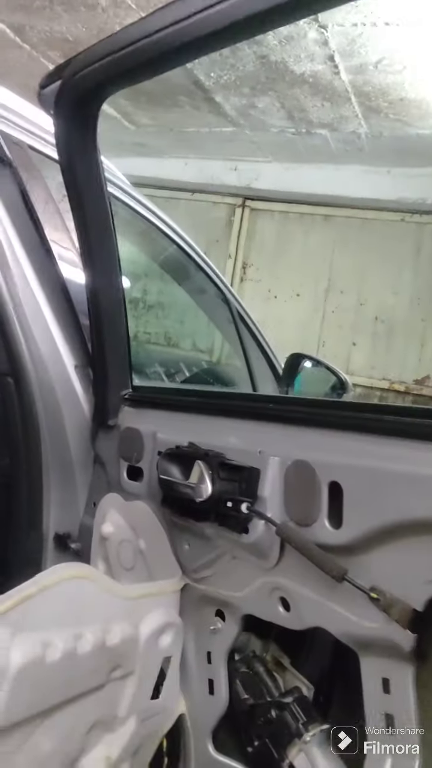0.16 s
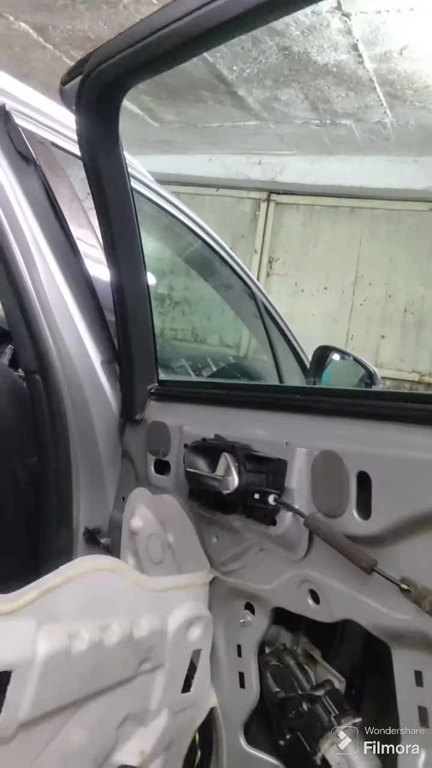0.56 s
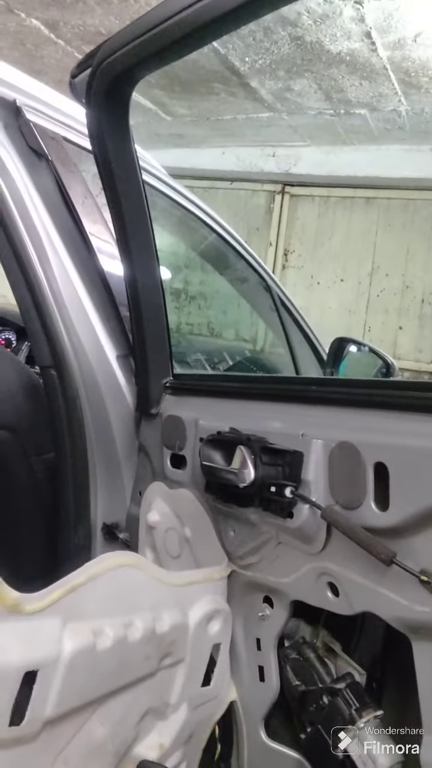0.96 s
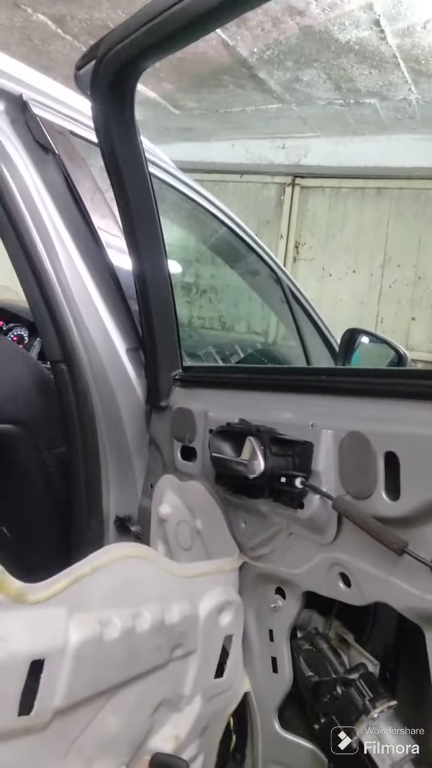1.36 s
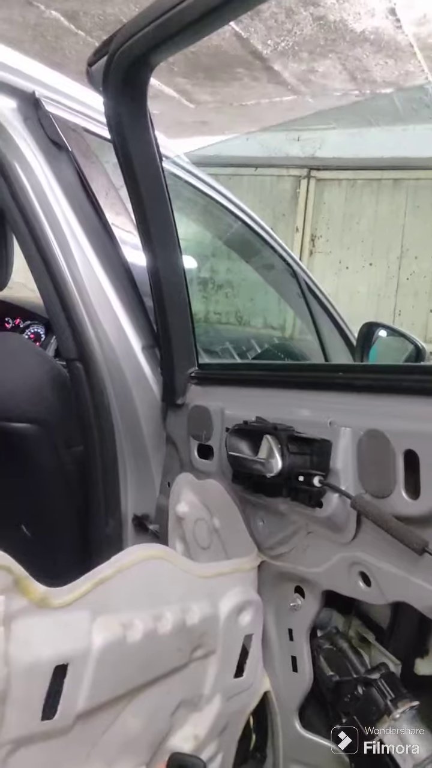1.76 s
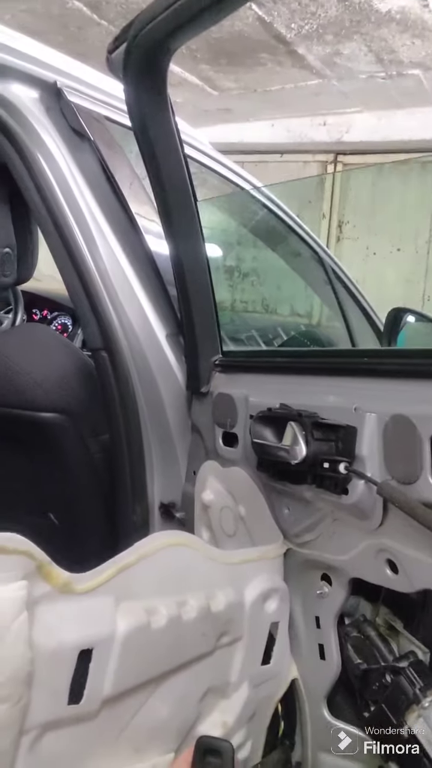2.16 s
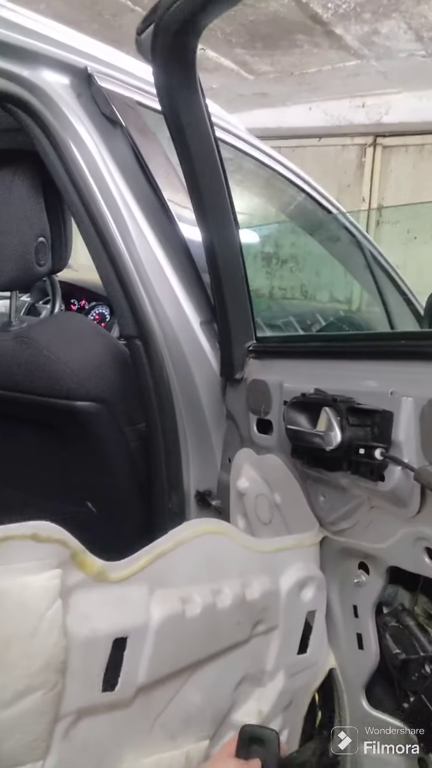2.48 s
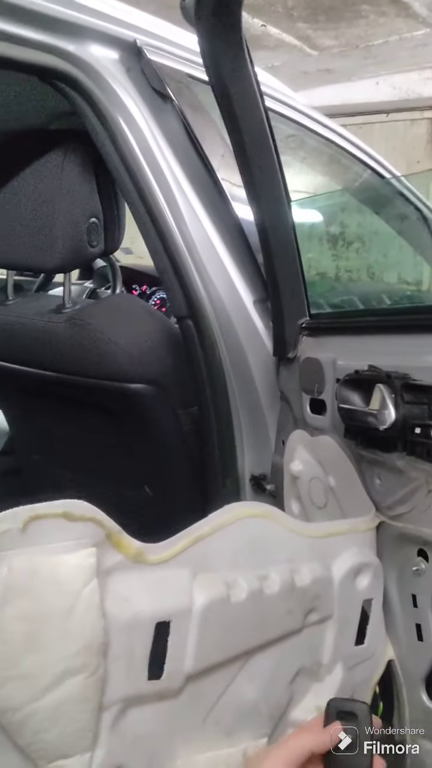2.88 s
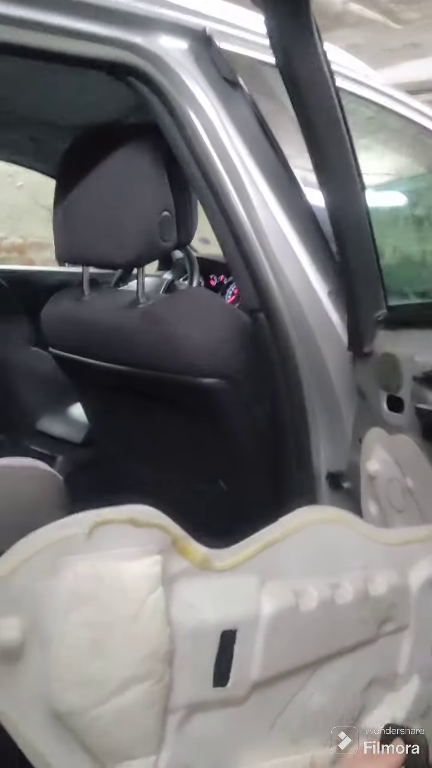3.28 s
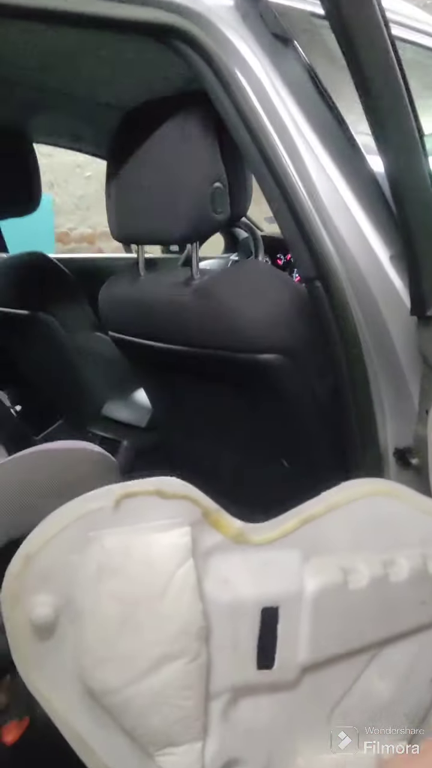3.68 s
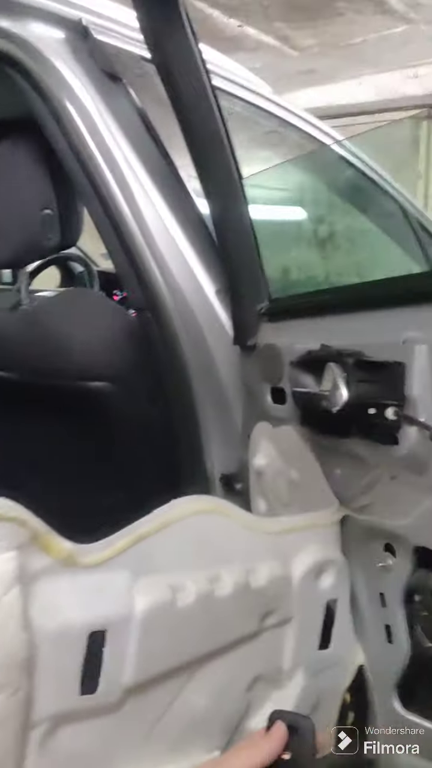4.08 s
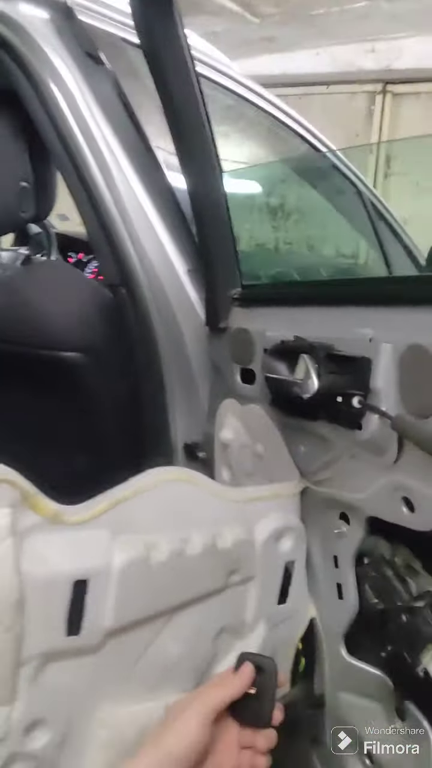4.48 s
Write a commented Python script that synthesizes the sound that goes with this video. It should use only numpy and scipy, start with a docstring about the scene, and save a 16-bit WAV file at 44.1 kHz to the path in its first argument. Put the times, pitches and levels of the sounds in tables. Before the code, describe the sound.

Close to a car door with its trim removed in a quiet garage, two clicks with small knocks come first over low hum. A third click brings a heavy hollow knock and scrape as the window motor starts. It whirs and buzzes steadily, growing rougher under load, then cuts off with a click and clunk. The glass briefly rubs as it settles, followed by near silence and faint ticks.

```python
"""A quiet garage hums, then a relay clicks: a window motor in a stripped car door is about to run.
The drive takes up its slack with a knock, the glass pulls out of its seal and runs down, the motor brakes
and the glass settles. The motor is sine tones and noise locked to one turning shaft; relays, seal and small
ticks are shaped noise; blows ring the modes of the door shell; hum, murmur, hush and thin tones lie behind."""
import sys
import numpy as np
from scipy import signal
from scipy.fft import rfft, irfft, next_fast_len
from scipy.io import wavfile
from scipy.ndimage import map_coordinates

SR = 44100
rng = np.random.default_rng(int(sys.argv[2]) if len(sys.argv) > 2 else 0)


def ratio(d):
    """dB to gain"""
    e = np.asarray(d, float) / 20
    return 10 ** e


def log_audio(samples):
    """Write samples as a 16-bit WAV file to the path given in sys.argv[1]."""
    # one column per channel
    frames = np.atleast_2d(samples).T
    # limit to full scale, then quantise
    limited = np.clip(frames, -1, 1)
    pcm = np.round(limited * 32767).astype(np.int16)
    wavfile.write(sys.argv[1], SR, pcm)


N = 204121


def unit(x):
    """Scale to rms 1."""
    return x / np.sqrt(np.mean(x ** 2) + 1e-20)


def along(points, hz):
    """Read a curve of (Hz, value) points on a log frequency axis."""
    f, v = np.transpose(points)
    return np.interp(np.log(hz + 1), np.log(f + 1), v)


def curves(rows):
    """One value per sample for each column after the time."""
    s, *cols = np.transpose(rows)
    return [np.interp(np.arange(N) / SR, s, c) for c in cols]


def gate(start, stop, rise, fall):
    """Fade in over rise seconds from start; after stop, drop 60 dB in each fall seconds."""
    t = np.arange(N) / SR
    return np.clip((t - start) / rise, 0, 1) * ratio(-60 * np.maximum(t - stop, 0) / fall)


def wobble(rate):
    """A smooth random curve, rate knots a second."""
    s = np.arange(0, N + 32, 32) / SR
    knots = rng.standard_normal(int(N * rate / SR) + 4)
    return np.interp(np.arange(N) / SR, s, map_coordinates(knots, [s * rate]))


def coloured(x, gain_db):
    """Filter x by a dB function of frequency."""
    m = next_fast_len(len(x) + 4096)
    gain = ratio(gain_db(np.fft.rfftfreq(m, 1 / SR)))
    return irfft(rfft(x, m) * gain, m)[:len(x)]


def noise(spectrum, length=N, tilt_db=0):
    """Noise of rms 1 with a spectrum, tilted by dB per octave about 2 kHz."""
    white = rng.standard_normal(length)
    return unit(coloured(white, lambda f: along(spectrum, f) + tilt_db * np.log2((f + 50) / 2000)))


def peaks(rings):
    """dB gain over frequency of (Hz, width Hz, dB) resonances."""
    return lambda f: sum(db / (1 + (2 * (f - c) / w) ** 2) for c, w, db in rings)


BARS = 10  # commutator bars on the shaft
# How fast commutator bars pass the brushes: start_s, bar_rate_hz [s, Hz]
SPEED = [(1.27, 881.0), (1.308, 893.8), (1.59, 865), (1.696, 866.6), (1.78, 859.0), (1.846, 835),
         (1.948, 856), (2.032, 841.5), (2.154, 848.5), (2.196, 837.1), (2.318, 830), (2.536, 846),
         (2.548, 851.6), (2.64, 850.5)]
# The glass meets a stiffer stretch of track: start_s, load, effort_db [s, 0-1, dB]
DRIVE = [(1.26, 0.08, 6), (1.33, 0.02, 2), (1.48, 0.18, 1), (1.62, 0.31, -2.5), (1.75, .52, -2.5),
         (1.83, 0.64, 0), (1.93, 0.73, 1), (2.2, 0.83, 0.5), (2.4, 0.88, 0.5), (2.64, .98, -0.5)]


def motor():
    """One slightly unsteady shaft angle, with load and effort, drives every tone and noise of the motor."""
    bar_hz, = curves(SPEED)
    load, effort_db = curves(DRIVE)
    load = np.clip(load, 0, 1)
    turn = 2 * np.pi * np.cumsum(bar_hz * (1 + .0015 * wobble(30))) / SR / BARS  # shaft angle, radians
    low = gear_growl(turn, load, effort_db) + shaft_tones(turn, load, effort_db)
    running = (low + brush_hiss(turn, load, effort_db)) * gate(1.105, 2.655, rise=0.11, fall=0.17)
    bars = bar_tones(turn, load, effort_db) * gate(1.215, 2.645, rise=0.066, fall=0.071)
    return running + bars + throb(turn, load) * gate(1.09, 2.71, rise=0.061, fall=0.49)


# Commutator tones at zero effort; the swing comes once a turn:
# bar_rate_multiple, light_load_db, heavy_load_db, swing_rad [-, dB, dB, radians]
BAR_TONES = [(2, -65.5, -63, 0.74), (3, -70.5, -68, 1.4), (4, -64.5, -61.5, 0.44), (5, -64, -63.5, 0.49),
             (6, -68, -66, .7), (7, -68, -67, .7), (9, -77, -77, 1.9), (10, -79, -68, 1.6),
             (12, -84, -75, 1.6), (13, -76.5, -69, 1.6)]


def bar_tones(turn, load, effort_db):
    """Multiples of the bar rate; the armature runs a little off centre, so each swings in phase once a turn."""
    grows, flicker_db = 1.34, 3  # dB per dB of effort; random level flicker
    out = 0
    for k, light_db, heavy_db, swing in BAR_TONES:
        level_db = (1 - load) * light_db + load * heavy_db + grows * effort_db
        level = ratio(level_db + flicker_db * wobble(9.005))
        out = out + level * np.sin(k * BARS * turn + swing * np.sin(turn + k))
    return out


# Shaft orders at light and at heavy load, relative levels: turn_multiple, level_db [-, dB]
SHAFT_LIGHT = [(1, -7), (2, -3.5), (3, 5.5), (4, -1), (5, -1.5), (6, -3.5), (7, -6.5), (8, -13.5), (9, 3),
               (10, -6), (11, -5), (12, -12), (13, -16), (14, -38), (15, -23), (16, -14), (17, -45),
               (18, -8), (19, -47), (20, -12), (21, -36), (22, -7.5)]
SHAFT_HEAVY = [(1, 0), (2, -29), (3, -6.5), (4, 1), (5, -4.5), (6, -2), (7, -13.5), (8, -2), (9, -7.5),
               (10, 3), (11, -1), (12, -9), (13, -17), (14, -39), (15, -31), (16, -14), (17, -45),
               (18, -14), (19, -48), (20, -17.5), (21, -37), (22, -6)]
LOW_GROWS = 0.33  # dB that shaft tones and growl gain for each dB of effort


def shaft_tones(turn, load, effort_db):
    """Multiples of the turning rate, each wavering in level and phase; the first order is left to throb()."""
    orders = 0
    for (k, light_db), (_, heavy_db) in zip(SHAFT_LIGHT[1:], SHAFT_HEAVY[1:]):
        level = ratio((1 - load) * light_db + load * heavy_db + 3 * wobble(5))
        orders = orders + level * np.sin(k * turn + .35 * wobble(5))
    return ratio(-54.8 + LOW_GROWS * effort_db) * unit(orders)


def throb(turn, load):
    """The shaft throbs in the door once per turn, rising 13 dB as the load goes from 0.55 to 0.67."""
    free = np.clip((0.67 - load) / .12, 0, 1)
    return ratio(-50 - 13 * free + 2.2 * wobble(18)) * np.sin(turn)


# Gear growl at light and at heavy load: pitch_hz, density_db [Hz, dB per Hz]
GROWL_LIGHT = [(65, -47.5), (110, -16), (261, -1.5), (301, -9), (434, -6), (563, -13.5), (771, -3),
               (1230, -23), (2500, -14.5), (3250, -38), (5500, -120)]
GROWL = [(65, -40.5), (110, -1), (136, -17.5), (232, -2), (338, -4.5), (563, -8), (856, -8.5),
         (1170, -11.5), (1730, -12), (2500, -23.5), (3250, -52), (5500, -120)]


def gear_growl(turn, load, effort_db):
    """Low noise crossfaded from light to heavy colour by the load, pulsing gently once a turn."""
    growl = np.sqrt(1 - load) * noise(GROWL_LIGHT) + np.sqrt(load) * noise(GROWL)
    pulse = (1 + 0.12 * np.sin(turn)) * ratio(2.1 * wobble(24.8))
    return ratio(-55 + LOW_GROWS * effort_db) * growl * pulse


# Brush hiss and the sizzle above it: pitch_hz, density_db [Hz, dB per Hz]
HISS = [(590, -37), (1000, -1.5), (1510, -9), (1730, -3), (2340, -8.5), (3120, -5.5), (3370, -7),
        (3600, -7.5), (4260, -8), (7500, -21.5), (9750, -39), (16500, -120)]
SIZZLE = [(3820, -25.5), (6500, -2), (7910, -8.5), (8490, -2), (9910, -3), (10800, -2), (14600, -6.5),
          (16000, -11)]


def brush_hiss(turn, load, effort_db):
    """Brush noise pulsing with each bar, plus a rub that repeats each turn, in two bands that grow with effort."""
    pulsed = rng.standard_normal(N) * (1 + .4 * np.sin(BARS * turn))
    rub = .75 * pulsed + .65 * repeating(turn, renew=14)
    hiss, sizzle = [unit(coloured(rub, lambda f: along(spectrum, f))) for spectrum in (HISS, SIZZLE)]
    hiss_level = ratio(-58 + 1.06 * effort_db)
    sizzle_level = ratio(-63 + 0.65 * effort_db + 3 * load)
    return (hiss_level * hiss + sizzle_level * sizzle) * ratio(1.2 * wobble(39.96))


def repeating(turn, renew):
    """A rubbing pattern that returns each turn, a comb of shaft orders, blending into new ones renew times a second."""
    size = 1024  # points round the shaft
    spectra = rfft(rng.standard_normal((int(N / SR * renew) + 2, size)))
    patterns = irfft(spectra[:, :190], size)  # smooth: orders below 190 only
    where = [np.arange(N) / SR * renew, turn / (2 * np.pi) % 1 * size]
    return unit(map_coordinates(patterns, where, order=1, mode="grid-wrap"))


# Relay contacts: start_s, snap_db, tail_db, tilt_db [s, dB, dB, dB per octave]
CLICKS = [(0.3782, -29.5, -47, 3.5), (0.772, -34.5, -50, -2), (1.1035, -28, -42.5, -2),
          (2.653, -32, -47, -2.2)]
# Colour of a relay click: pitch_hz, density_db [Hz, dB per Hz]
RELAY = [(530, -29), (900, -9.5), (1120, -3.5), (1340, -17.5), (1680, -0.5), (1960, -6.5), (2160, -6),
         (4120, -4.5), (5900, -7), (8150, -6.5), (8970, -12.5), (10700, -6), (16000, -16)]
# Relay case resonances: pitch_hz, width_hz, gain_db [Hz, Hz, dB]
RELAY_RINGS = [(1610, 130, 6), (1820, 120, 7), (3020, 440, 7.5), (3890, 280, 7), (4130, 200, 3.5),
               (4950, 184, 5), (6630, 450, 5), (6980, 270, 5), (10600, 520, 3.5), (12900, 520, 3),
               (14700, 330, 13)]


def clicks():
    """A snap of a few ms through the relay case; a duller tail follows and dies ever faster."""
    snap_t60_s, tail_t60_s, rise_s = .015, .113, .0003
    out, t = np.zeros(N + SR), np.arange(SR // 3) / SR
    for s, snap_db, tail_db, tilt_db in CLICKS:
        # the case rings a little differently at each click
        rings = peaks([(hz, width, db + 1.5 * rng.standard_normal()) for hz, width, db in RELAY_RINGS])
        sharp, dull = [unit(coloured(noise(RELAY, len(t), tilt_db - lean), rings)) for lean in (0, 1.5)]
        snap = ratio(snap_db - 60 * t / snap_t60_s) * sharp
        tail = ratio(tail_db - 30 * t / tail_t60_s - 30 * (t / tail_t60_s) ** 3) * dull
        out[round(s * SR):][:len(t)] += (snap + tail) * (1 - np.exp(-t / rise_s))
    return out[:N]


# Blows on the door shell; modes one breadth from the centre lose 6 dB:
# start_s, level_db, centre_hz, breadth_octaves [s, dB, Hz, octaves]
BLOWS = [(.381, -50, 1500, 2.7), (.396, -51, 358, 0.8), (.776, -43.5, 600, 2.2), (.79, -45, 304, 1.2),
         (1.106, -38, 300, 2.1), (1.118, -30, 240, 1.7), (1.141, -34.5, 600, 4), (1.158, -37, 760, 2),
         (1.171, -38, 230, 1.34), (1.24, -49.5, 260, 0.53), (2.664, -37, 1100, 1.1),
         (2.678, -36.5, 730, 0.62), (2.68, -47, 230, .5), (2.697, -42, 235, .6), (3.53, -68, 330, .7),
         (4.115, -67, 400, 2)]
# Door shell modes, relative level and decay before damping: pitch_hz, level_db, t60_s [Hz, dB, s]
DOOR = [(125, -6, .15), (179.6, -2, 0.26), (203.4, -7, 0.39), (237, 3.5, 0.22), (297.3, 4, 0.18),
        (372.3, -1.5, 0.38), (445.3, -4, 0.13), (536, -5.5, 0.14), (621, -1, 0.18), (666, -4, 0.091),
        (760, -1.5, 0.19), (1006, -5.5, 0.17), (1093, -6.5, 0.19), (1270, -3.5, 0.11), (1418, -6, 0.16),
        (1600, -22, 0.033), (1610, 7, 0.035), (1700, -24, 0.13), (2010, -3, 0.093), (2500, -5, 0.051),
        (3000, -18, 0.11)]


def door():
    """Each blow rings the shell modes near its own pitch, with loose parts crunching."""
    free_below_db, damping_per_db, rise_s = -45.5, 0.0755, 0.0033
    out, t = np.zeros(N + SR), np.arange(SR // 2) / SR
    hz, mode_db, t60 = np.transpose(DOOR)[:, :, None]
    for s, db, centre_hz, octaves in BLOWS:
        # harder blows keep the parts pressed on the shell, so it dies sooner
        damping = 1.13 + damping_per_db * max(db - free_below_db, 0)
        reach = lambda f: -6 * (np.log2((f + 20) / centre_hz) / octaves) ** 2
        # each mode strays in level (dB) and in pitch (share of its frequency)
        stray_db, detune = rng.standard_normal((2, len(DOOR), 1)) * [[[2]], [[.008]]]
        level = ratio(db + mode_db + reach(hz) + stray_db - 60 * damping * t / t60)
        phase = 100 * detune  # scattered too
        ring = (level * np.sin(2 * np.pi * (hz * (1 + detune) * t + phase))).sum(0)
        rattle = unit(coloured(noise(GROWL, len(t)), reach))
        crunch = ratio(db - 0.5 - 60 * damping * t / 0.23) * rattle
        out[round(s * SR):][:len(t)] += (ring + crunch) * (1 - np.exp(-t / rise_s))
    return out[:N]


# The whole door sways on its hinges: start_s, level_db, pitch_hz, length_s [s, dB peak, Hz, s]
SWAY = [(1.124, -29.5, 59, 0.093), (1.225, -41.5, 57.2, 0.094), (1.342, -46, 51.7, 0.052),
        (1.411, -47.5, 50, 0.085), (2.735, -45.5, 48, 0.084)]


def sway():
    """Each sway of the hinged door is a short low sine that swells and sinks."""
    out, t = np.zeros(N + SR), np.arange(SR // 2) / SR
    for s, db, sway_hz, length in SWAY:
        swell = np.sin(np.pi * np.clip(t / length, 0, 1)) ** 2
        out[round(s * SR):][:len(t)] += ratio(db) * swell * np.sin(2 * np.pi * sway_hz * t)
    return out[:N]


# Pressure of the glass in its rubber seal, one list leaving the top lip and one settling in the guides:
# start_s, level_db [s, dB]
DRAG = [
    [(1.125, -40.5), (1.147, -39), (1.205, -55.5), (1.231, -39.5), (1.271, -50.5), (1.33, -51.5)],
    [(2.75, -66), (2.79, -56), (2.835, -59), (2.85, -54.5), (2.9, -54), (2.936, -57.5), (3.015, -67),
     (3.05, -86.5)],
]
# Colour of the glass leaving the top lip, and settling in its guides: pitch_hz, density_db [Hz, dB per Hz]
LIP = [(290, -42), (500, -6.5), (774, 1.5), (962, -13), (1270, 0.5), (1800, -1.5), (3780, -4),
       (14600, -36.5), (16200, -36)]
SEAL = [(120, -36), (200, -3), (232, -0.5), (305, -12), (374, 4.5), (492, 2), (1690, 1), (2030, -3),
        (2390, -3), (5090, -14.5), (10000, -32.5), (13000, -42), (16200, -46)]
# Pane resonances: pitch_hz, width_hz, gain_db [Hz, Hz, dB]
SEAL_RINGS = [(1210, 90, 8), (1680, 170, 11), (2050, 220, -12), (2580, 250, 9), (3450, 220, 9),
              (4370, 150, 6), (5170, 160, 12), (13000, 1500, 5)]


def drag():
    """Stick-slip grains of the glass against rubber; resting in its guides the pane rings along."""
    lip_bright, seal_bright = 0.39, 0.76  # bright share 0-1 at full pressure
    dulling_per_db = 0.07  # the settling glass dulls as it eases
    out = np.zeros(N)
    rings = peaks(SEAL_RINGS)
    for rows, spectrum, share, resting in zip(DRAG, (LIP, SEAL), (lip_bright, seal_bright), (0, 1)):
        level_db, = curves(rows)
        grains = ratio(0.89 * wobble(300) + 1.74 * wobble(60))
        pane = lambda f: resting * rings(f)
        dull, bright = [unit(coloured(noise(spectrum, tilt_db=lean) * grains, pane)) for lean in (-3, 3)]
        mix = np.clip(share + resting * dulling_per_db * (level_db - level_db.max()), 0, 1)
        stroke = np.sqrt(1 - mix) * dull + np.sqrt(mix) * bright
        out += ratio(level_db) * stroke * gate(rows[0][0], rows[-1][0], rise=0.014, fall=0.047)
    return out


# Small ticks of armatures and trim, each around one pitch:
# start_s, level_db, pitch_hz, width_hz, t60_s [s, dB before the decay, Hz, Hz, s]
TICKS = [(0.356, -56, 2520, 2200, 0.045), (0.379, -44, 10800, 2500, .04), (.384, -47, 1890, 500, 0.11),
         (.533, -72, 4500, 6000, .058), (0.54, -72.5, 3700, 400, 0.14), (.548, -72.5, 2650, 500, 0.2),
         (0.78, -43, 1610, 398, 0.071), (1.0808, -48, 2650, 1600, 0.07), (1.138, -33.5, 2500, 2500, 0.013),
         (1.2249, -34, 3000, 3000, 0.1), (1.243, -38.5, 2800, 3000, 0.07), (2.654, -39, 5600, 1600, 0.056),
         (2.843, -58, 1500, 1470, 0.045), (3.266, -77, 1490, 2500, .2), (3.301, -71.5, 1260, 1020, 0.17),
         (3.4367, -77, 2200, 3000, 0.15), (4.0204, -76, 3500, 6000, 0.1), (4.0456, -75, 2500, 2500, 0.11),
         (4.1105, -59, 2340, 350, 0.07), (4.111, -63.5, 5000, 14000, .03), (4.111, -75, 6380, 500, .13),
         (4.113, -76, 12900, 1400, .13), (4.17, -78.5, 5000, 6000, 0.076), (4.281, -62, 620, 450, 0.03)]


def ticks():
    """Short noise in one resonance over a faint broad edge."""
    edge_db = -15  # under the pitched part
    out, t = np.zeros(N + SR), np.arange(SR // 4) / SR
    for s, db, hz, width, t60 in TICKS:
        resonance = lambda f: -20 * np.log10(1 + (2 * (f - hz) / width) ** 2)
        ping = unit(coloured(rng.standard_normal(len(t)), resonance))
        tick = ping + ratio(edge_db) * noise(RELAY, len(t), tilt_db=-2.9)
        shape = ratio(-60 * t / t60) * (1 - np.exp(-t / 0.00076))
        # hold the energy of the shape, whatever the noise draws
        out[round(s * SR):][:len(t)] += ratio(db) * np.sqrt(np.mean(shape ** 2)) * unit(tick * shape)
    return out[:N]


# The low hum swells, then dies down: start_s, level_db [s, dB]
HUM = [(0, -63), (.17, -66.5), (.27, -60), (.62, -59), (.7, -53.5), (.79, -59), (.95, -52), (1.08, -60),
       (1.6, -58), (2.15, -63.5), (2.7, -58), (3.02, -59), (3.15, -67.5), (4.63, -68)]


def low_hum():
    """The garage hum: a drifting sine near 46.5 Hz with low noise, wavering twice as deep by the end."""
    late = np.arange(N) / (N - 1)
    hum_db = curves(HUM)[0] + 1.5 * (1 + late) * wobble(14)
    pitch_hz = 46.5 + 0.98 * wobble(1.9)
    rumble = noise([(22, -25.5), (40, 0.0), (62, -8.5), (75, -36.0), (90, -120)])
    return ratio(hum_db) * (np.sin(2 * np.pi * np.cumsum(pitch_hz) / SR) + 0.34 * rumble)


# Colour of the garage murmur: pitch_hz, density_db [Hz, dB per Hz]
MURMUR = [(39, -37), (66, -3.5), (102, -3), (215, -8), (232, -8.5), (336, -13.5), (462, -21.5),
          (900, -29.5), (1170, -44), (1980, -120)]


def murmur():
    """Low room noise over a deep band of noise that grows from start to end."""
    late = np.arange(N) / (N - 1)
    deep = noise([(45, -29), (60, 1), (105, -0.5), (125, -30), (160, -120)])
    deep_db = (1 - late) * -87.5 + late * -74
    return ratio(-72 + .8 * wobble(14)) * noise(MURMUR) + ratio(deep_db) * deep


# Colour of the microphone hush: pitch_hz, density_db [Hz, dB per Hz]
HUSH = [(290, -40), (500, -8.5), (921, -7.5), (1010, -5), (1180, -7.5), (3730, -15), (4010, -14),
        (7380, -25), (15100, -21.5), (16200, -20)]


def hush():
    """Faint microphone noise, barely wavering."""
    return ratio(-83 + 0.35 * wobble(5.3)) * noise(HUSH)


# Thin electronic tones: pitch_hz, start_db, end_db [Hz, dB about rms, dB about rms]
WHINE = [(999, -86, -92.5), (2000, -92, -93.5), (2970, -102, -98), (3990, -88, -95.5), (4970, -95, -97)]


def whine():
    """Steady thin sines, each sliding between two levels and fading a little in and out."""
    t = np.arange(N) / SR
    late = t / t[-1]
    out = 0
    for hz, start_db, end_db in WHINE:
        level = ratio((1 - late) * start_db + late * end_db + 2.5)  # from about rms to sine peak
        out = out + level * ratio(1.8 * wobble(3)) * np.sin(2 * np.pi * hz * t)
    return out


def scene():
    """Everything reaches one microphone."""
    mechanism = motor() + clicks() + door() + sway() + drag() + ticks()
    garage = low_hum() + murmur() + hush() + whine()
    return (mechanism + garage)[None]


def top_cut(x):
    """Nothing passes above the cut-off."""
    return signal.sosfilt(signal.butter(12, 16500, fs=SR, output="sos"), x)


def record(dry):
    """A phone keeps little above its band limit: 28 dB less beyond 15950 Hz."""
    kept = coloured(dry[0], lambda f: -28 * (f > 15950))[None]
    return top_cut(kept)


dry = scene()
out = record(dry)
log_audio(out)
```